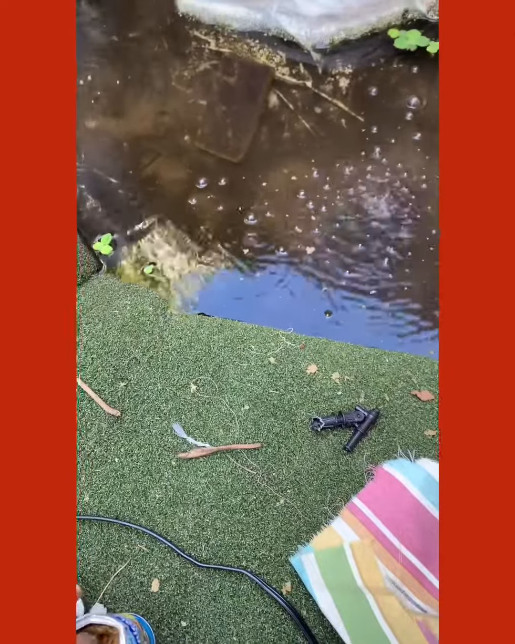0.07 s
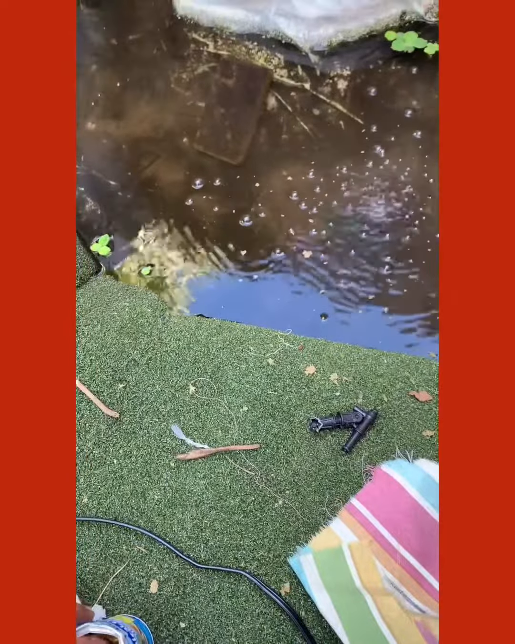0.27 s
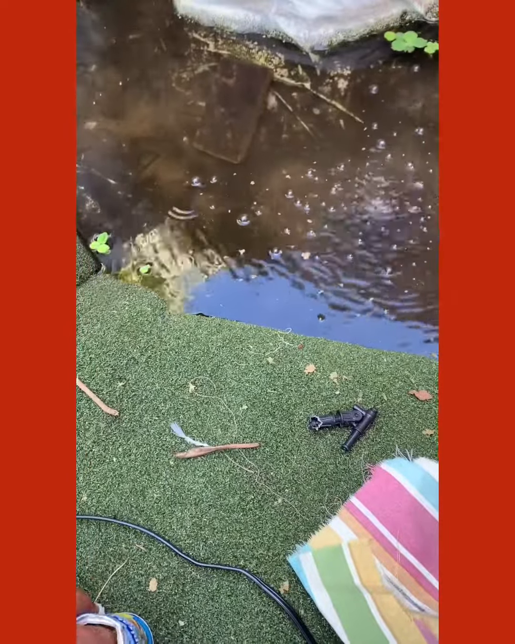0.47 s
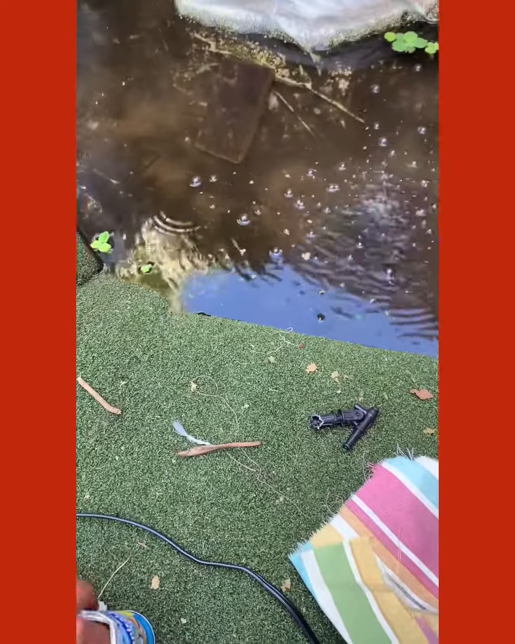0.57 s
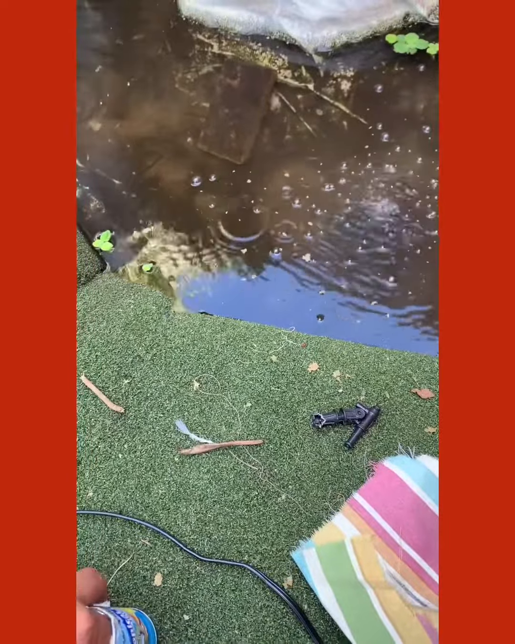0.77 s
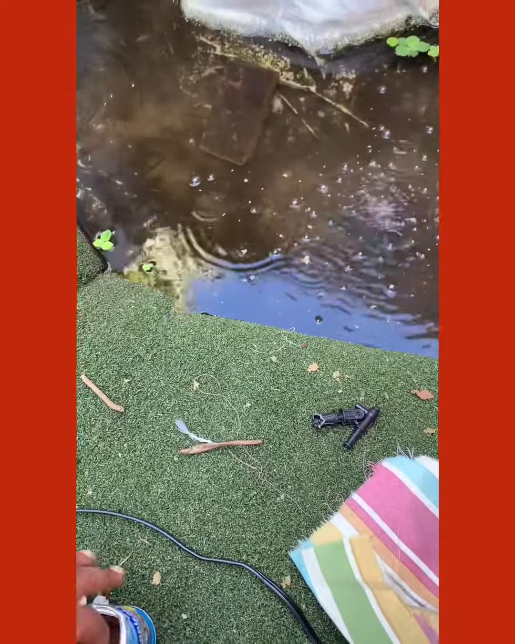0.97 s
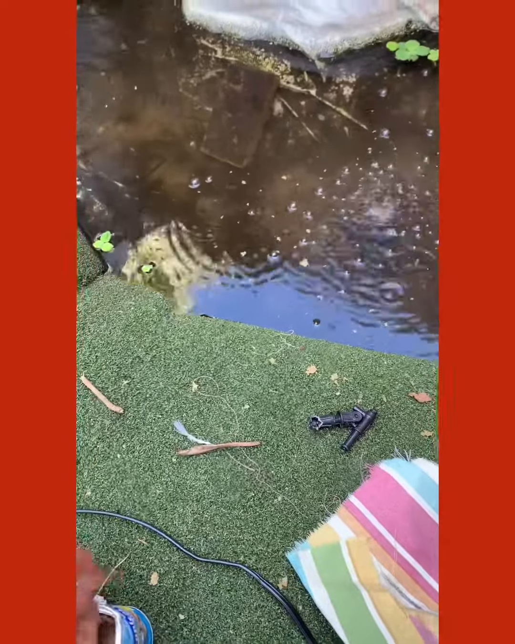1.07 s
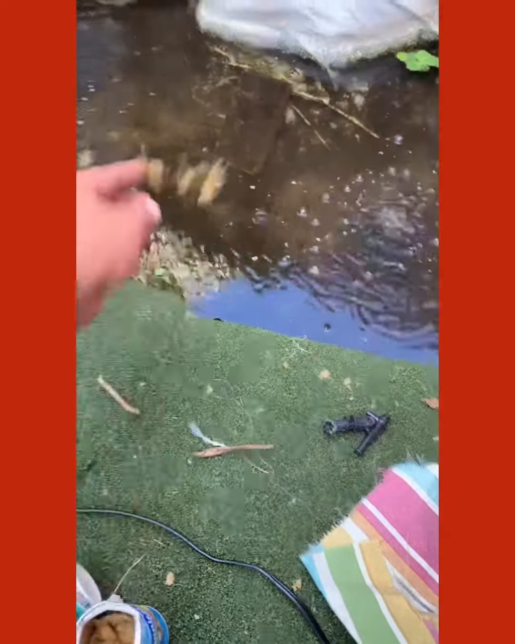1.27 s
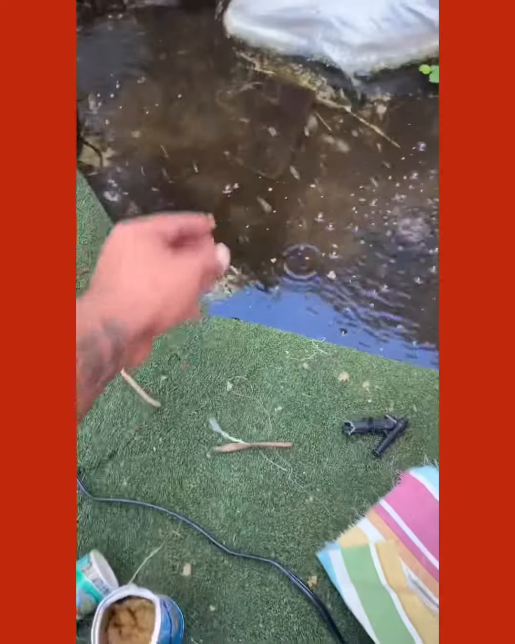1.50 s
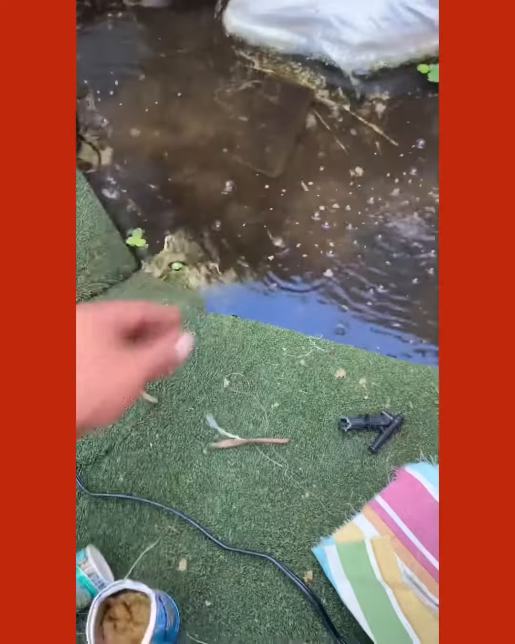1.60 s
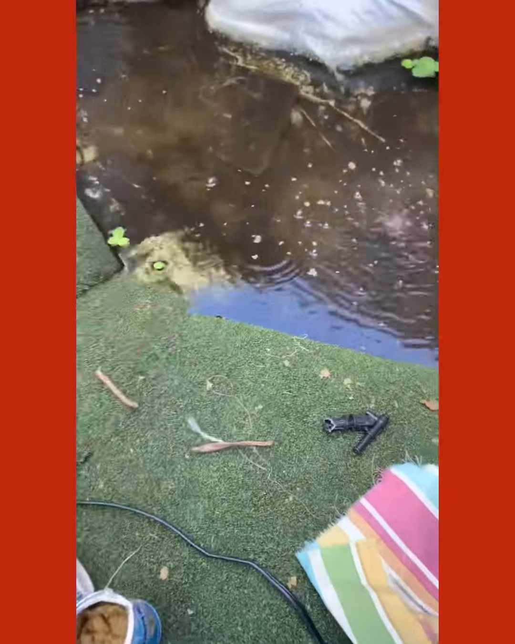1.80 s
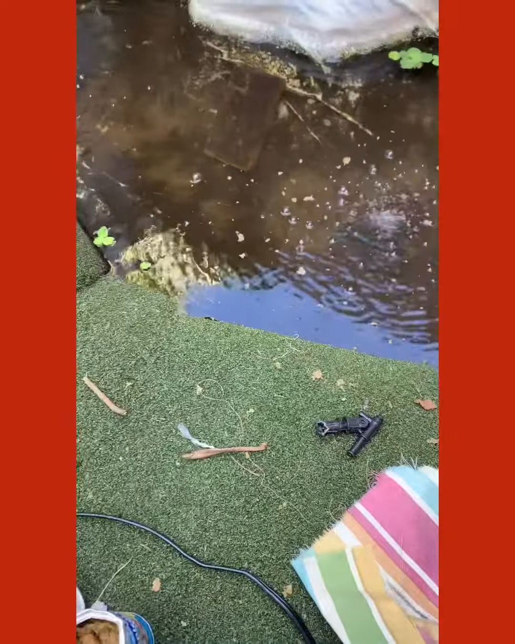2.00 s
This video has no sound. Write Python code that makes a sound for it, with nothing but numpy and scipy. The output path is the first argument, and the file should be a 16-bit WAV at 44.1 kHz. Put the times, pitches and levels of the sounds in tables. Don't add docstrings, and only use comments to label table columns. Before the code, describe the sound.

Small fish snap at floating pellets with sharp, bright watery ticks in loose clusters, over steady pattering outflow, fine spray and a low pump hum; outdoor garden pond, close handheld phone, faint distant traffic rumble.

```python
import sys
import numpy as np
from scipy import signal
from scipy.fft import rfft, irfft, next_fast_len
from scipy.io import wavfile
from scipy.ndimage import uniform_filter1d

SR = 44100
rng = np.random.default_rng(int(sys.argv[2]) if len(sys.argv) > 2 else 0)


def master(y):
    cut = np.clip(np.atleast_2d(y).T, -1, 1)
    pcm = np.round(cut * 32767)
    wavfile.write(sys.argv[1], SR, pcm.astype(np.int16))


def volts(x):
    e = np.asarray(x, float) / 20
    return 10 ** e


N = 90316
M = next_fast_len(N)
F = np.maximum(np.fft.rfftfreq(M, 1 / SR), 1)
T = np.arange(M) / SR


def curve(table, log=True):
    hz, value = np.array(table, float).T
    if log:
        return np.interp(np.log(F), np.log(hz), value)
    return np.interp(F, hz, value)


def walk(rate_hz):
    hold = int(SR / rate_hz)
    steps = np.repeat(rng.standard_normal(M // hold + 1), hold)
    return 1.18 * uniform_filter1d(uniform_filter1d(steps, hold), hold)[:M]


def noise_bed(table, swell_db, flicker_db, grain_db, grain_s):
    hold = max(int(grain_s * SR), 1)
    drops = np.repeat(rng.exponential(size=M // 20 + 1), hold)
    grain = volts(grain_db * uniform_filter1d(drops, hold)[:M])
    noise = rng.standard_normal((2, M)) * grain / np.sqrt(np.mean(grain ** 2))
    low_hz, high_hz = table[0][0], table[-1][0]
    octaves_past = np.maximum(np.log2(low_hz / F), 0) + np.maximum(np.log2(F / high_hz), 0)
    colour_db = curve(table) - 60 * octaves_past
    spectrum = rfft(noise) * volts(colour_db) * np.sqrt(SR / 2)
    swell = walk(1.27)
    out = 0
    for octave in np.arange(np.floor(np.log2(low_hz)) - 1, np.log2(high_hz) + 1):
        share = np.cos(np.pi / 2 * np.clip(np.log2(F) - octave, -1, 1)) ** 2
        out = out + irfft(spectrum * share, M) * volts(swell_db * swell + flicker_db * walk(12.2))
    return out


# hz, density_db_per_hz
RUMBLE_SPECTRUM = [(20, -64.5), (48, -49), (82, -58), (135, -53.5), (200, -64.5), (260, -65.5), (400, -69),
                   (520, -87)]


def town_rumble():
    return noise_bed(RUMBLE_SPECTRUM, swell_db=-0.83, flicker_db=0.5, grain_db=0.2, grain_s=0.012)


# hz, density_db_per_hz
PATTER_SPECTRUM = [(420, -76.5), (600, -75), (950, -73), (1500, -74), (2100, -81.5), (2600, -83),
                   (3300, -86.5), (4400, -91.5)]


def outflow_patter():
    return noise_bed(PATTER_SPECTRUM, swell_db=2.0, flicker_db=0.7, grain_db=1.5, grain_s=0.003)


# hz, density_db_per_hz
SPRAY_SPECTRUM = [(3800, -99.5), (4800, -91), (6500, -93), (8500, -96.5), (10500, -99), (13000, -99),
                  (14500, -104), (15700, -106)]
# time_s, level_db
FEEDING_LEVEL = [
    (0, -4.5),
    (.4, -1.5),
    (.62, 0),
    (.75, -2.5),
    (.95, 2.5),
    (1.25, -3.5),
    (1.55, -2),
    (1.8, -2.5),
    (2.05, -4),
]


def spray():
    feeding_db = np.interp(T, *np.array(FEEDING_LEVEL).T)
    hiss = noise_bed(SPRAY_SPECTRUM, swell_db=0.3, flicker_db=-0.1, grain_db=1.42, grain_s=0.0009)
    return volts(feeding_db) * hiss


# harmonic_multiple, level_db
PUMP_LINES = [(3, -43), (4, -46.5), (5, -55), (7, -62), (13, -67), (14, -56.5), (16, -60), (17, -62),
              (18, -62.5), (20, -62), (21, -67), (24, -59.5), (70, -87), (84, -88)]


def pump():
    shaft_hz = 58.7
    shaft_phase = 2 * np.pi * shaft_hz * T + 0.03 * walk(3.9)
    hum = 0
    for multiple, level_db in PUMP_LINES:
        level = np.sqrt(2) * volts(level_db + 2.67 * walk(8.31))
        phase = multiple * shaft_phase + 0.86 * walk(6.15) + 2 * np.pi * rng.random()
        hum = hum + level * np.sin(phase)
    return hum


def snap(centre_hz, width_hz, body_db, noise):
    tick_s, body_s, body_hz = 0.00015, 0.00015, 3950
    crack_s, crack_db = 0.0003, -15
    slap_s, slap_smear_s, slap_db = 0.0033, 0.00086, -22
    fizz_t60_s, fizz_db = 0.072, -22.5
    t = np.arange(len(noise)) / SR - 0.001

    def bump(spread_s):
        return np.exp(-0.5 * (t / np.where(t < 0, 0.86 * spread_s, spread_s)) ** 2)

    ring = bump(min(tick_s, 0.61 / width_hz)) * np.cos(2 * np.pi * centre_hz * t)
    body = volts(body_db) * bump(body_s) * np.sin(2 * np.pi * body_hz * t)
    crack = volts(crack_db) * bump(crack_s) * noise
    slap = volts(slap_db) * np.exp(-0.5 * ((t - slap_s) / slap_smear_s) ** 2)
    fizz = volts(fizz_db) * (t > 0) * volts(-60 * t / fizz_t60_s)
    edges_hz = [max(centre_hz - 0.52 * width_hz, 300), min(centre_hz + 0.64 * width_hz, 0.45 * SR)]
    band = signal.butter(2, edges_hz, "band", fs=SR, output="sos")
    splash = signal.sosfilt(band, noise) * np.sqrt(SR / width_hz) / 2
    return ring + body + crack + (slap + fizz) * splash


# start_s, level_db, centre_hz, width_hz, body_db
SNAPS = [(0.1047, -46, 6600, 3000, -20), (0.208, -39, 8350, 3000, -15), (0.2141, -40.2, 11000, 4000, -15),
         (0.4134, -36.5, 10600, 5000, -8), (0.4452, -40, 13800, 3000, -25), (0.4517, -38, 11500, 6700, -4),
         (0.5954, -22.5, 8900, 5200, -7), (0.5985, -44, 13300, 2500, -25), (0.604, -34, 8100, 4500, -10),
         (0.6128, -28, 8400, 3500, -18), (0.612, -39, 14200, 4000, -25), (0.6237, -40, 15000, 3000, -25),
         (0.6311, -37, 9100, 3500, -15), (0.641, -36, 9000, 2400, -7), (0.6572, -42, 7000, 4500, -10),
         (0.663, -43.6, 7000, 4200, -15), (0.814, -36, 9450, 5000, -14), (0.8704, -45, 7000, 3000, -15),
         (0.9245, -33, 9500, 6000, -8), (0.9277, -35, 7500, 4000, -10), (0.9292, -34.5, 8100, 4200, -3),
         (0.9488, -43, 7800, 2900, -15), (0.9822, -34, 9700, 4000, -10), (0.982, -35, 13100, 2500, -25),
         (1.0263, -41, 10800, 3900, -12), (1.1559, -29, 12100, 4000, -20), (1.2094, -38, 9500, 5000, -10),
         (1.2116, -30, 9200, 4500, -16), (1.2148, -38, 10500, 3500, -25), (1.3257, -45, 11500, 4000, -15),
         (1.4489, -30.5, 10400, 3700, -2), (1.467, -35, 13000, 4000, -25), (1.4922, -44, 12500, 3000, -25),
         (1.518, -20.5, 10100, 3400, -9.5), (1.5565, -34.5, 12300, 5000, -16),
         (1.6097, -42, 7000, 3900, -10), (1.701, -41, 8500, 7100, -10), (1.761, -41.5, 11500, 1800, -25),
         (1.9375, -33.5, 10000, 5500, -12)]


def fish_snaps():
    gain_db, length = 1, 4096
    out = np.zeros(M + 8192)
    for start_s, level_db, centre_hz, width_hz, body_db in SNAPS:
        i = int((start_s - 0.001) * SR)
        noise = rng.standard_normal(length)
        out[i:i + length] += volts(level_db + gain_db) * snap(centre_hz, width_hz, body_db, noise)
    return out[:M]


# start_s, pitch_hz, glide_ratio, length_s, level_db
BUBBLE_PLIPS = [
    (0.453, 2130, 1.36, 0.0133, -39),
    (0.43, 1440, 0.87, 0.004, -55),
    (0.478, 1400, 1.1, 0.038, -42.5),
    (0.6, 1900, 0.46, 0.0012, -36),
    (1.1553, 7000, 1.01, 0.0029, -47.5),
    (1.174, 8500, 1.2, 0.003, -44),
    (1.401, 1387, 1.386, 0.0163, -39.5),
    (1.404, 4700, 1.03, 0.0068, -50),
    (1.744, 2000, 1, .012, -51),
]


def bubbles():
    out = np.zeros(M + 8192)
    for start_s, pitch_hz, glide_ratio, length_s, level_db in BUBBLE_PLIPS:
        i = int(start_s * SR)
        u = np.arange(int(length_s * SR)) / (length_s * SR)
        swell = np.sin(np.pi * u ** 0.53)
        cycles = pitch_hz * length_s * (u + (glide_ratio - 1) * u ** 2 / 2)
        out[i:i + len(u)] += volts(level_db) * swell * np.sin(2 * np.pi * cycles)
    return out[:M]


# start_s, end_s
INSECT_CALLS = [
    (1.68, 2.1),
]


def insect():
    centre_hz, width_hz, level_db = 8650, 340, -61.5
    gate = np.zeros(M)
    for start_s, end_s in INSECT_CALLS:
        gate += (T > start_s) * (T < end_s)
    gate = uniform_filter1d(gate, 900)
    band = np.exp(-0.5 * ((F - centre_hz) / width_hz * 2) ** 2)
    buzz = irfft(rfft(rng.standard_normal(M)) * band, M)
    return volts(level_db + 2.0 * walk(25.0)) * gate * buzz / buzz.std()


# hz, lag_rad
PORT_LAG = [(60, 0.047), (430, -0.34), (800, 0.96), (1300, 1.24), (1800, 0.16), (2550, 2.17), (3400, 1.35),
            (4900, np.pi)]
# hz, likeness_0_to_1
PORT_LIKENESS = [(60, 1), (260, 0.98), (430, 0.83), (600, 0.21), (1500, 0.45), (2200, 0.44), (3300, 0.83),
                 (4500, 0.88)]
# hz, level_db
PORT_LEAN = [(40, -0.6), (130, 0.5), (260, 4), (500, 3.5), (950, 1.5), (1150, 0.1), (1500, -1.7),
             (2000, -0.3)]


def two_ports(diffuse, near):
    turn_hz = 4130
    near = rfft(near)
    a, b = rfft(diffuse)
    alike = np.clip(curve(PORT_LIKENESS), 0, 1)
    lag_rad = curve(PORT_LAG, log=False) + 2 * np.pi * np.maximum(F - PORT_LAG[-1][0], 0) / turn_hz
    right = alike * a + np.sqrt(1 - alike ** 2) * b + near
    right = right * np.exp(-1j * lag_rad) * volts(curve(PORT_LEAN))
    return irfft(np.array([a + near, right]), M)[:, :N]


def scene():
    diffuse = town_rumble() + outflow_patter() + spray()
    near = pump() + fish_snaps() + bubbles() + insect()
    return two_ports(diffuse, near)


def top_cut(x):
    return signal.sosfilt(signal.butter(12, 16000, fs=SR, output="sos"), x)


def record(dry):
    top_hz, top_cut_db, slope_hz = 15750, -22, 150
    trim = volts(top_cut_db * np.clip((F - top_hz) / slope_hz, 0, 1))
    mix = irfft(rfft(dry, M) * trim, M)[:, :N]
    return top_cut(mix)


dry = scene()
out = record(dry)
master(out)
```